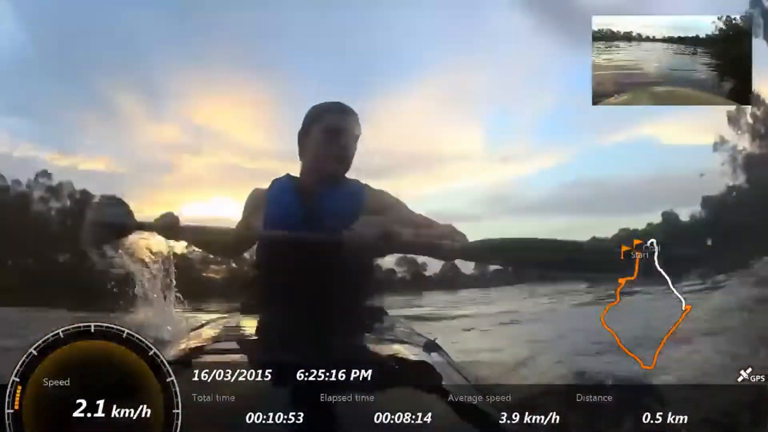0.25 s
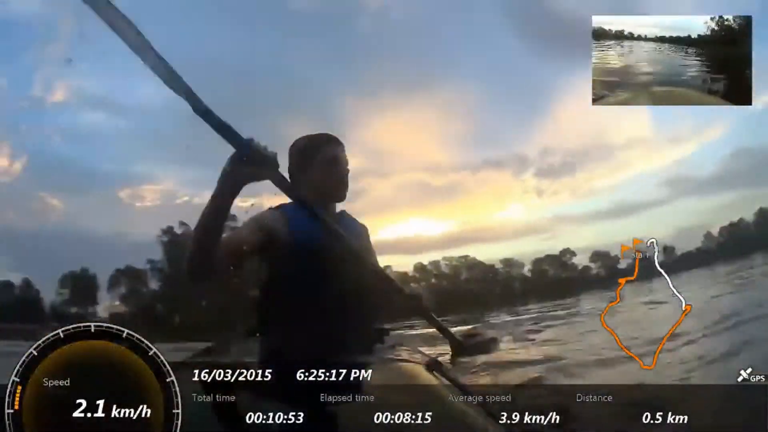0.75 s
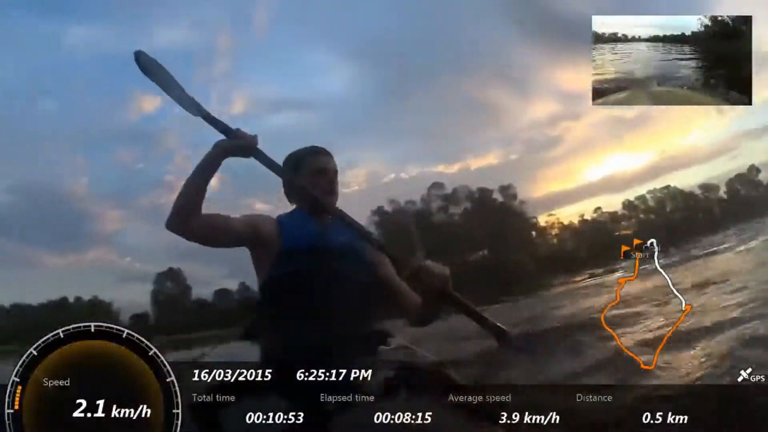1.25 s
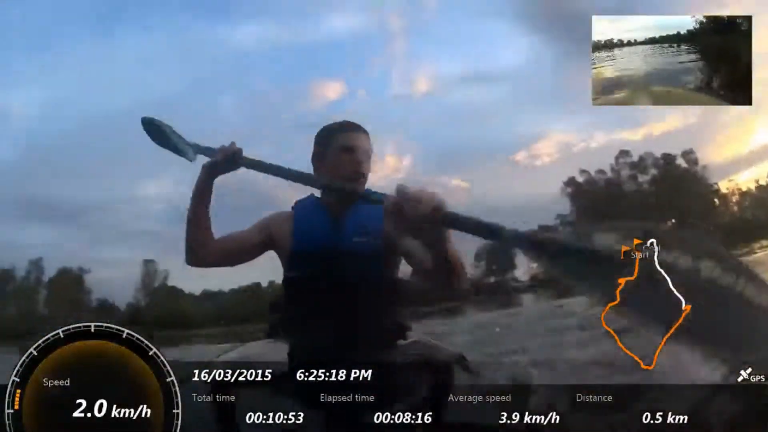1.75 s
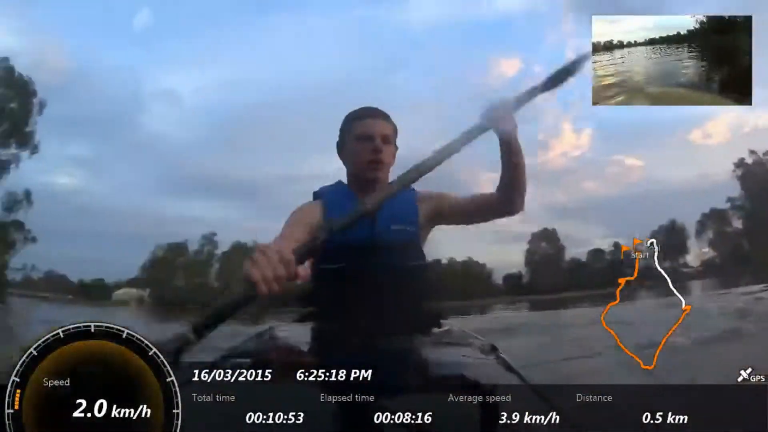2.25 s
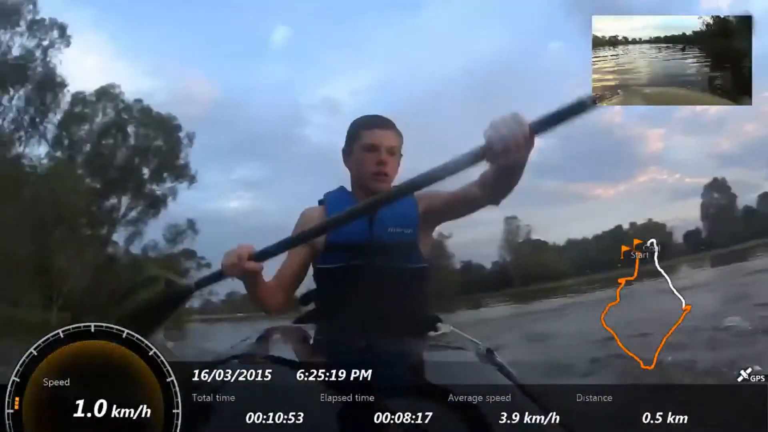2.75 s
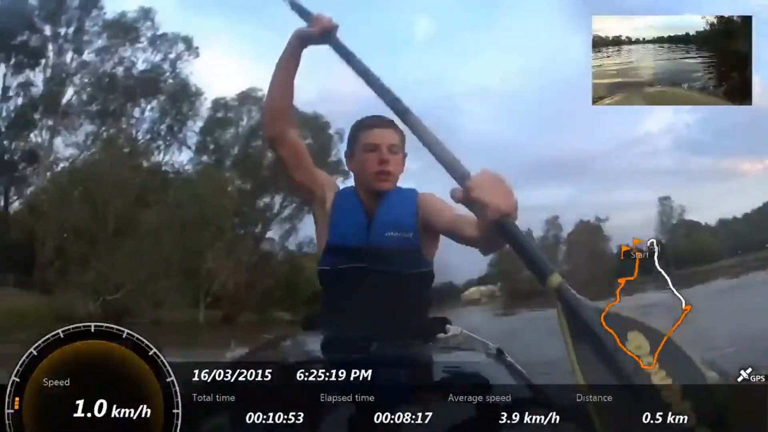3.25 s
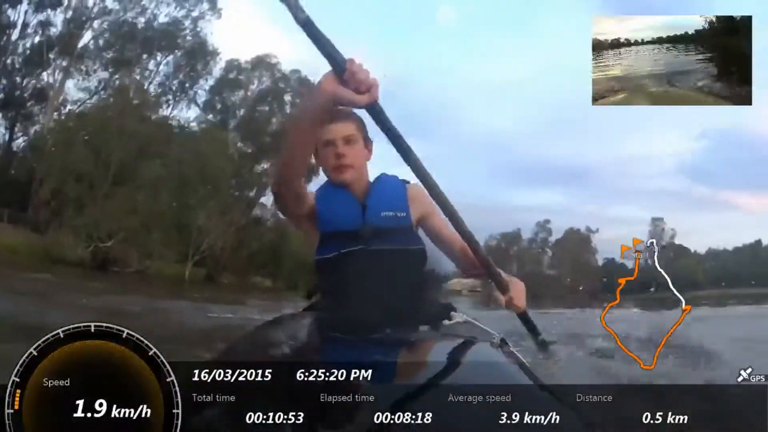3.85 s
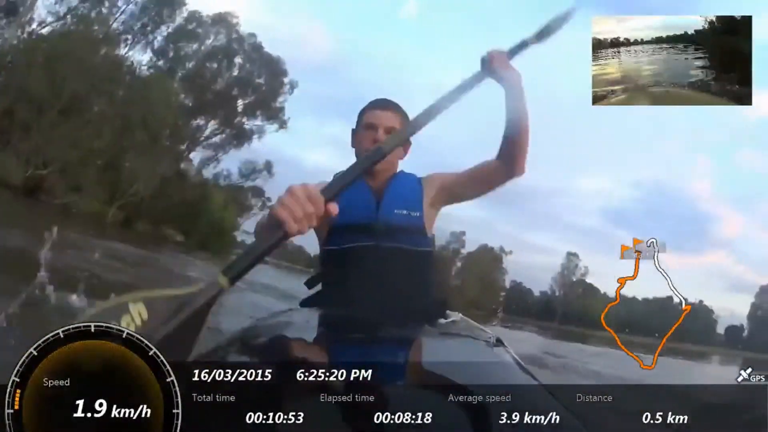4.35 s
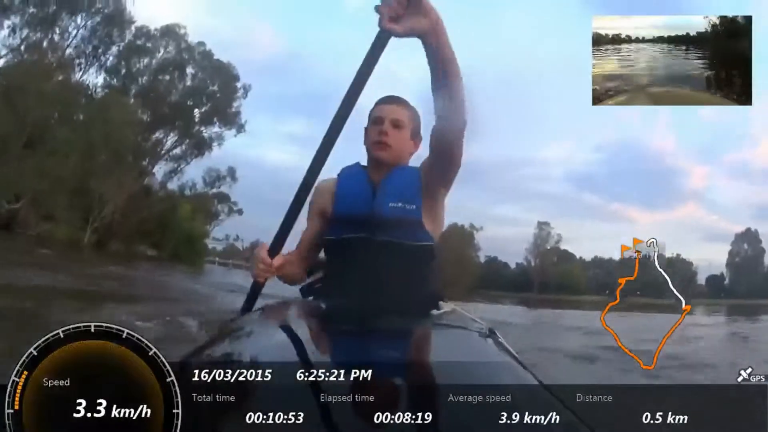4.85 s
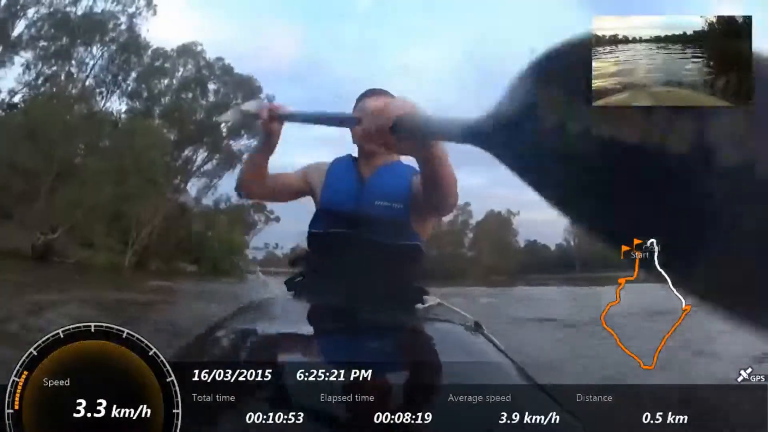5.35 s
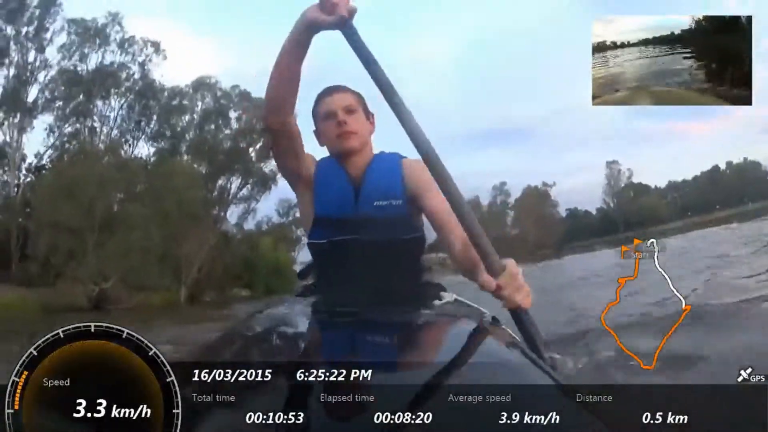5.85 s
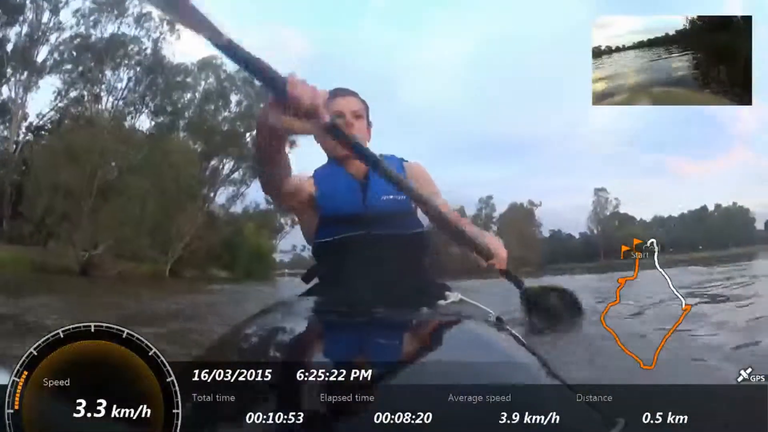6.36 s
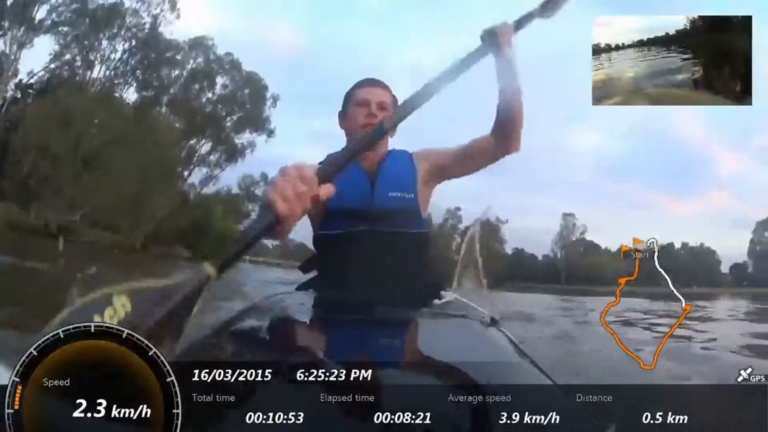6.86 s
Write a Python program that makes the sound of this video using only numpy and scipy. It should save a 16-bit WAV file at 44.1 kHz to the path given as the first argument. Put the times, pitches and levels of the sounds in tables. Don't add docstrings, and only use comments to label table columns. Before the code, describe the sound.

Close, muffled river water churns, knocks and plops against a hollow kayak hull, thinning after three seconds to separate laps, drips and dull booms.

```python
import sys
import numpy as np
from scipy import signal
from scipy.fft import rfft, irfft, next_fast_len
from scipy.io import wavfile
from scipy.ndimage import uniform_filter1d

SR = 44100
rng = np.random.default_rng(int(sys.argv[2]) if len(sys.argv) > 2 else 0)


def transcribe(u):
    v = np.clip(np.atleast_2d(u).T, -1, 1)
    q = np.round(v * 32767).astype(np.int16)
    wavfile.write(sys.argv[1], SR, q)


def gain_from_decibels(decibels):
    exponent = np.asarray(decibels, float) / 20
    return 10 ** exponent


N = 313110

# [t/s, slide level/dB, spray level/dB]
FLOW = [(0.0, -31, -27), (0.3, -32.5, -29.5), (0.85, -37.5, -35), (1.24, -33.5, -31.5), (1.5, -37.5, -35.5),
        (1.9, -31, -34.5), (2.2, -29.5, -31.5), (2.63, -31.5, -27.5), (2.82, -30, -34.5),
        (2.98, -40.5, -37.5), (3.45, -43, -40), (3.68, -50.5, -41), (4.2, -41.5, -40), (4.6, -46.5, -45),
        (4.9, -41, -39.5), (5.5, -39, -39.5), (6.45, -42, -35), (7.1, -45.5, -36.5)]
# [crest t/s, crest level/dB, time to rise 10 dB/s, time to sink 10 dB/s]
WAVES = [(0.339, -33, 0.03, 0.1), (0.653, -30, 0.09, 0.1), (0.818, -35, 0.06, 0.04),
         (0.916, -32.5, 0.07, 0.12), (1.111, -32, 0.06, 0.03), (1.199, -31.5, 0.05, 0.2),
         (1.564, -36, 0.04, 0.06), (1.712, -31, 0.07, 0.1), (0.5, -32, 0.03, 0.12),
         (3.015, -34, 0.03, 0.025), (3.103, -32.5, 0.02, 0.035), (3.255, -31, 0.1, 0.035),
         (3.36, -33, 0.03, 0.08), (3.606, -36, 0.04, 0.035), (3.755, -39, 0.05, 0.04),
         (3.985, -41, 0.08, 0.2), (4.204, -38.5, 0.07, 0.06), (4.395, -37, 0.02, 0.16),
         (4.594, -35, 0.025, 0.06), (5.05, -40, 0.06, 0.05), (5.135, -35, 0.02, 0.04),
         (5.255, -39, 0.02, 0.05), (5.512, -33, 0.2, 0.07), (5.713, -41, 0.1, 0.15), (5.9, -35, 0.09, 0.04),
         (6.068, -39.5, 0.04, 0.06), (6.152, -39, 0.03, 0.1), (3.7, -38, 0.03, 0.04),
         (6.567, -40, 0.05, 0.14), (6.936, -41.5, 0.12, 0.2)]
# [t/s, gurgle level/dB, boom level/dB, time to sink 10 dB/s]
HEAVES = [(0.0, -23.5, -34, 0.22), (0.59, -25.5, -31, 0.3), (0.9, -28.5, -32, 0.1), (1.28, -28, -34, 0.22),
          (1.781, -26.5, -26, 0.24), (2.2, -33.5, -45, 0.35), (2.37, -39, -26, 0.1), (2.86, -29, -26, 0.11),
          (3.24, -35, -42, 0.3), (3.44, -32, -51, 0.27), (4.05, -35.5, -40, 0.27), (4.41, -28.5, -43, 0.14),
          (4.49, -45, -14, .08), (4.67, -32, -38, .08), (4.98, -49.5, -35, .15), (5.2, -27.5, -47, 0.23),
          (5.66, -26.5, -20.5, 0.14), (5.8, -29.5, -37, .2), (6.17, -53, -34, 0.06), (6.9, -48, -42, 0.65)]
# [t/s, peak level/dB]
MIST = [(0.0408, -49), (0.1545, -50), (0.2623, -48), (0.3586, -47), (0.4329, -53), (0.6794, -54),
        (1.0765, -50), (1.2017, -49), (1.4421, -51), (1.6377, -53), (1.7928, -56), (2.1959, -54),
        (2.4344, -52), (2.9233, -51), (3.0754, -53), (3.5533, -55), (3.7569, -57), (4.5999, -53),
        (5.8735, -55), (6.9331, -54)]
# [t/s, peak level/dB, pitch f/Hz, time to fall 60 dB/s]
GULPS = [(0.049, -14, 391, .12), (0.362, -11.5, 430, .07), (0.519, -23, 438, .09), (1.3, -30, 250, .12),
         (1.624, -26, 166, .05), (2.221, -12, 454, .08), (2.784, -16, 400, .1), (2.81, -18, 460, .1),
         (3.24, -30, 480, .11), (4.391, -22, 330, .07), (4.457, -36, 155, .12), (4.594, -28, 260, .2),
         (4.647, -29.5, 180, .09), (5.044, -34, 257, .05), (5.43, -30, 300, .1), (5.621, -26, 310, .1),
         (5.701, -27.5, 175, .08), (6.075, -33.5, 207, .1), (6.618, -34, 530, .12),
         (6.957, -31.5, 280, .12)]
# [t/s, peak level/dB]
DROPS = [(0.0608, -39), (0.2076, -33), (0.4884, -27), (0.62, -33.5), (0.6474, -29), (0.677, -26.5),
         (0.9115, -36), (1.343, -33.5), (2.25, -20.5), (2.2902, -30), (2.71, -28), (2.8255, -34.5),
         (3.1737, -35), (3.271, -30), (3.346, -31), (3.5923, -29.5), (4.1864, -35), (4.436, -31),
         (4.8356, -40), (4.9408, -33.5), (5.117, -32), (4.998, -36), (5.561, -31.5), (5.6956, -34),
         (6.093, -34), (6.156, -30.5), (6.266, -36), (6.5475, -39), (6.561, -28), (6.934, -27)]
# [t/s, peak level/dB, fizz level/dB]
SPLATS = [(1.1652, -45, -64), (1.2176, -28.5, -38), (1.3095, -32, -38), (1.4626, -33, -43),
          (1.74, -31.5, -36), (2.598, -29, -45), (3.06, -48, -43), (4.395, -36, -50), (4.425, -34, -47),
          (4.996, -44, -50), (4.582, -37, -46), (5.508, -30.5, -44), (5.8416, -34, -53),
          (5.9216, -37.5, -42), (6.073, -29, -40)]
# [t/s, peak level/dB, centre f/Hz]
BEADS = [(0.846, -32, 3570), (3.314, -30, 3500), (3.5925, -33, 3450), (3.71, -38, 3450), (3.942, -40, 3100),
         (4.3943, -34, 3400), (5.3502, -36, 3420), (6.2432, -28, 3480), (4.044, -40, 2830),
         (4.095, -40, 2400), (4.81, -40, 2830), (6.485, -38, 2700), (6.44, -38, 2830), (6.31, -38, 2830),
         (3.883, -42, 2700), (1.305, -34, 2050)]
# [t/s, peak level/dB, pitch f/Hz]
PINGS = [(0.417, -39, 4560), (0.6175, -49, 3750), (0.6175, -40, 4570), (0.8555, -41, 4240),
         (0.9991, -46, 4250), (1.0934, -41, 4320), (1.2516, -37, 4310), (1.295, -40, 5410),
         (1.3414, -41, 4320), (1.3917, -44, 4200), (1.4621, -37, 4370), (1.503, -44, 4570),
         (1.5219, -49, 4590), (1.5768, -44, 4560), (1.5958, -43, 3810), (1.7065, -39, 4050),
         (1.7444, -39, 5730), (1.8337, -45, 4180), (2.0348, -42, 4270), (2.0906, -31, 4220),
         (2.3346, -35, 4380), (2.3575, -37, 4520), (2.5706, -35, 4230), (2.6813, -37, 4480),
         (2.7072, -37, 3990), (2.7716, -42, 5620), (2.7926, -43, 4320), (2.8165, -45, 4280),
         (2.9243, -40, 3750), (2.9243, -32, 4060), (3.0475, -45, 4510), (3.0759, -45, 4490),
         (3.1732, -47, 4230), (3.2685, -46, 4140), (3.3149, -44, 4050), (3.3149, -40, 4230),
         (3.3508, -49, 4310), (3.5668, -40, 4650), (3.5922, -43, 4240), (3.7339, -39, 4580),
         (3.7569, -44, 4740), (3.8422, -49, 4120), (3.931, -45, 4130), (4.0442, -42, 4290),
         (4.3944, -44, 4270), (4.9187, -41, 4570), (4.9402, -42, 4620), (4.9965, -42, 5410),
         (5.2869, -43, 4600), (5.3507, -44, 4090), (5.4784, -46, 4240), (5.5084, -43, 4320),
         (5.6645, -44, 4060), (5.7768, -50, 4100), (5.9893, -48, 4240), (6.1325, -44, 5590),
         (6.5176, -45, 4430), (6.5934, -41, 4160), (6.7496, -44, 4100), (6.9676, -46, 4330)]
# [t/s, peak level/dB, pitch f/Hz]
PLOPS = [(0.0697, -31, 1610), (0.9727, -29, 1560), (1.1094, -26, 1580), (1.1857, -33, 1660),
         (1.4935, -29, 1500), (1.7928, -31, 1560), (2.2503, -28, 1610), (2.359, -28, 1600),
         (2.7482, -29, 1590), (2.9971, -31, 1560), (4.1774, -31, 1580), (4.4029, -32, 1610),
         (4.6528, -37, 1580), (4.808, -34, 1570), (4.9302, -33, 1590), (4.9467, -30, 1600),
         (5.1188, -30, 1570), (6.5625, -27, 1580)]
# [t/s, peak level/dB, centre f/Hz]
LAPS = [(0.096, -20, 1230), (0.26, -22, 942), (0.79, -23, 1030), (0.876, -22, 961), (1.095, -22, 1090),
        (1.198, -19, 1290), (1.219, -20, 1150), (1.306, -22, 1010), (1.34, -21, 1000), (1.379, -19, 1240),
        (1.798, -20, 1170), (1.828, -22, 1100), (1.947, -19, 1210), (2.049, -23, 1180), (2.096, -19, 999),
        (2.141, -20, 1180), (2.214, -18, 1180), (2.402, -20, 1180), (2.771, -19, 1220), (3.075, -19, 1270),
        (3.346, -22, 1190), (3.604, -25, 1020), (3.98, -26, 950), (4.158, -28, 1180), (4.37, -23, 1070),
        (4.969, -29, 1170), (5.366, -23, 1010), (5.413, -19, 1020), (5.529, -25, 1200), (5.846, -26, 926),
        (5.897, -23, 1280), (6.055, -27, 1190), (6.148, -26, 1150), (6.34, -28, 1340), (6.888, -30, 1580)]
# [t/s, peak level/dB, time to fall 60 dB/s]
KNOCKS = [(0.149, -19.5, .06), (0.478, -15, .08), (0.818, -15, .06), (0.915, -20, .06), (1.372, -18, .08),
          (1.46, -16, .05), (1.558, -16.5, .07), (1.909, -16, .06), (1.985, -17, .1), (2.07, -13.5, .065),
          (3.013, -19, .047), (3.742, -16, .09), (3.236, -18, .09), (4.41, -19, .12), (2.03, -18, .08),
          (4.198, -20, .08), (4.37, -14, .13), (5.167, -22, .08), (5.363, -15, .06), (5.44, -21, .06),
          (5.485, -21, .04), (6.915, -26, .1)]
# [t/s, peak level/dB, centre f/Hz]
SLAPS = [(0.191, -11.5, 1270), (0.333, -9.5, 986), (0.411, -16, 1250), (0.904, -20, 1020),
         (1.256, -14, 950), (1.397, -13, 980), (1.493, -13, 1100), (1.642, -13, 1420), (1.852, -15, 930),
         (1.981, -13, 970), (2.281, -18, 1190), (2.322, -15.5, 1460), (2.458, -15, 1150),
         (2.545, -13.5, 1010), (2.658, -14.5, 1340), (2.73, -10.5, 1020), (2.79, -17, 1030),
         (2.859, -15.5, 1120), (3.094, -14, 1250), (3.688, -18, 1270), (4.589, -17.5, 1220),
         (4.999, -16, 1050), (5.12, -11.5, 1010), (5.246, -13, 915), (5.393, -14, 940), (5.451, -13.5, 920),
         (5.508, -14.5, 990), (5.926, -15.5, 1480), (6.244, -18.5, 1400), (6.561, -24, 1670)]
# [f/Hz, level/dB]
SHELL = [(25, -50), (55, -28), (110, -19), (150, -8.5), (400, -8), (1100, -7), (1650, -11), (1800, -23),
         (3000, -23), (5000, -34.5), (6500, -34), (10000, -37), (11000, -65)]
# [f/Hz, width/Hz, level/dB]
RINGS = [(77, 23, 13), (626.6, 161, 7.5), (833, 54, -6), (985, 72, 7), (1250, 294, 7), (1587, 79, 6.5),
         (2250, 290, -4.5), (2820, 227, 7.5), (3420, 190, 6.5), (3785, 195, -8), (4212, 250, 8),
         (4584, 390, 6), (5700, 590, 5)]
# [f/Hz, share 0-1]
SAME = [(45, .82), (150, .9), (260, .74), (400, .52), (520, .92), (1550, .9), (1850, .35), (2300, .65),
        (3700, .4), (4600, .7), (7000, .45)]
# [f/Hz, left leads by/rad]
LEAD = [(0, 0), (260, -.35), (420, -.1), (750, -1.35), (1100, .5), (1420, -.55), (1700, 1.5), (2000, .3),
        (2250, 2.8), (2800, .6), (3150, 2.5), (4500, .2), (5300, -.5), (5900, 2.8)]
# [f/Hz, left minus right/dB]
TILT = [(100, .5), (150, -4), (430, -1.2), (620, -3.8), (1000, -.8), (1200, -3.2), (1550, 0), (2450, 3),
        (3500, -2), (5700, 2), (9000, -1)]

CALM_GURGLE_DB, CALM_BOOM_DB = -7.5, -11
HEAVE_RISE = .6
SPRAY_FOLLOW = .25
SMACK = 2.5
FIZZ_DB = -26.5
DROP_HZ, DROP_OCTAVES, BEAD_OCTAVES, PING_OCTAVES = 2826, .31, .16, .14
TICK_DB, PING_DB, LAP_DB, PLOP_DB, BUBBLE_DB = -.4, .3, -4.5, -.5, -6.5
LAP_T60, PLOP_T60, BUBBLE_T60, SLAP_T60 = .045, .045, .07, .052
GLIDE = .13
KNOCK_HZ = 620
HISS_DB, RUMBLE_DB = -69.6, -76.5
CEILING = .21
EDGE_HZ = 11060


def evened(x):
    return x / np.sqrt(np.mean(x ** 2) + 1e-20)


def read(points, hz):
    f, value = np.transpose(points)
    return np.interp(np.log(hz + 1), np.log(f + 1), value)


def add(mix, s, sound):
    part = mix[:, round(s * SR):][:, :sound.shape[1]]
    part += sound[:, :part.shape[1]]


def shell_db(hz):
    rings = sum(db / (1 + (2 * (hz - f) / width) ** 2) for f, width, db in RINGS)
    return read(SHELL, hz) + rings


def hump(hz, centre_hz, octaves):
    return np.maximum(-6 * (np.log2((hz + 1) / centre_hz) / octaves) ** 2, -45)


def no_lows(hz, knee_hz, octaves):
    return hump(np.minimum(hz, 2100), knee_hz, octaves)


def causal(db):
    mirrored = np.concatenate([db, db[-2:0:-1]])
    log_gain = np.log(gain_from_decibels(mirrored))
    spectrum = np.exp(np.conj(signal.hilbert(log_gain)))
    return np.fft.ifft(spectrum).real[:4096]


def swells(t, calm_db, s, crest_db, rise_s, sink_s):
    late = t[:, None] - s
    crests = crest_db - 10 * np.where(late > 0, late / sink_s, -late / rise_s)
    return 10 * np.log10(gain_from_decibels(2 * calm_db) + gain_from_decibels(2 * crests).sum(1))


def bubbles(per_s, spread_db, cycles, lo_hz, hi_hz, count=16):
    out, grains = np.zeros((2, N + SR // 2)), []
    kind = rng.integers(0, count, (2, N))
    loudness = gain_from_decibels(spread_db * np.minimum(rng.exponential(1, N), 3.4))
    size = loudness * (rng.random(N) < per_s / SR)
    for hz in np.geomspace(lo_hz, hi_hz, count):
        u = np.arange(int(3 * cycles * SR / hz)) * hz / SR
        tone = np.sin(2 * np.pi * u * (1 + 0.1113 * u / cycles))
        grain = tone * np.exp(-2 * u / cycles) * np.minimum(u / 2.6, 1)
        grains.append(evened(grain) / np.sqrt(len(u) / hz))
    for at in np.flatnonzero(size):
        for port, k in enumerate(kind[:, at]):
            out[port, at:at + len(grains[k])] += size[at] * grains[k]
    return evened(out[:, :N])


def flow():
    big = bubbles(per_s=1300, spread_db=1.6, cycles=9., lo_hz=129.2, hi_hz=1882.6)
    fine = bubbles(per_s=800, spread_db=4.1, cycles=10., lo_hz=1847, hi_hz=6310)
    drive = rng.standard_normal((2, N)) + 0.6 * big + 0.7 * fine
    hz, t, z = signal.stft(drive, SR, nperseg=1024, noverlap=896)

    s, *levels = np.transpose(FLOW)
    slide, spray = (np.interp(t, s, c) for c in levels)
    rush = swells(t, slide, *np.transpose(WAVES))
    s, gurgle_db, boom_db, sink_s = np.transpose(HEAVES)
    rise_s = HEAVE_RISE * sink_s
    gurgle = swells(t, slide + CALM_GURGLE_DB, s, gurgle_db, rise_s, sink_s)
    boom = swells(t, slide + CALM_BOOM_DB, s, boom_db, rise_s, sink_s)

    low = 1 / (1 + (hz / 400) ** 4)[:, None]
    deep = 1 / (1 + (hz / 110) ** 6)[:, None]
    high = 1 / (1 + (2000 / (hz + 1)) ** 8)[:, None]
    field = (1 - low - high) * (rush - .4)
    field += high * (spray - 3.5 + SPRAY_FOLLOW * (rush - slide))
    field += (low - deep) * gurgle + deep * boom

    noise = rng.standard_normal((len(t), len(hz))).T
    patches = uniform_filter1d(uniform_filter1d(noise, 9, 0), 14, 1)
    scattered_spray = uniform_filter1d(uniform_filter1d(noise[::-1], 22, 0), 5, 1)
    gusts = uniform_filter1d(rng.standard_normal(len(t)), 9)
    spray_sheets = uniform_filter1d(rng.standard_normal(len(t)), 12)
    field += 2.0 * evened(patches) + 0.16 * evened(gusts)
    field += 1.6 * high * (evened(scattered_spray) + evened(spray_sheets))

    rough = signal.istft(z * gain_from_decibels(field), SR, nperseg=1024, noverlap=896)[1][:, :N]
    taps = causal(shell_db(np.fft.rfftfreq(8192, 1 / SR)))
    taps = taps[None] / np.linalg.norm(taps)
    return gain_from_decibels(-3.6) * signal.oaconvolve(rough, taps, axes=1)[:, :N]


def blow(peak_db, colour_db, rise_s, t60, size=8192):
    t = np.arange(size) / SR
    fall = gain_from_decibels(-60 * t / t60) + 0.21 * gain_from_decibels(-18 * t / t60)
    shape = (1 - np.exp(-t / rise_s)) * fall
    burst = rng.standard_normal((2, size)) * shape * np.cos(np.pi * t / t[-1] / 2)
    burst[:, 12] += SMACK
    sound = signal.fftconvolve(burst, causal(colour_db)[None, :size], axes=1)[:, :size]
    return gain_from_decibels(peak_db) * sound / abs(sound).max(1, keepdims=True)


def bubble(peak_db, hz, t60):
    t = np.arange(int(t60 * SR)) / SR
    tone = np.sin(2 * np.pi * hz * t * (1 + GLIDE * t / t60)) * np.minimum(t / .0012, 1)
    return np.outer([1, 1], gain_from_decibels(peak_db - 60 * t / t60) * tone)


def fizz():
    out, hz = np.zeros((2, N)), np.fft.rfftfreq(2048, 1 / SR)
    colour_db = shell_db(hz) + hump(hz, 7800, .55)
    rows = [(s, db + 3) for s, db in MIST]
    rows += [(s, db + FIZZ_DB) for s, db in DROPS]
    rows += [(s, fizz_db) for s, _, fizz_db in SPLATS]
    for s, fizz_db in rows:
        add(out, s, blow(fizz_db + 3.5, colour_db, .0003, .0066, size=1024))
    return out


def gulps():
    out, hz = np.zeros((2, N)), np.fft.rfftfreq(8192, 1 / SR)
    for s, peak_db, pitch_hz, t60 in GULPS:
        colour_db = shell_db(hz) + hump(hz, pitch_hz, .27)
        add(out, s, blow(peak_db - 6.5, colour_db, .0037, t60))
        add(out, s + .003, bubble(peak_db - 12, pitch_hz, 1.6 * t60))
    return out


def drops():
    out, hz = np.zeros((2, N)), np.fft.rfftfreq(2048, 1 / SR)
    rows = [(s, db, DROP_HZ, DROP_OCTAVES) for s, db, *_ in DROPS + SPLATS]
    rows += [(*row, BEAD_OCTAVES) for row in BEADS]
    rows += [(s, db + PING_DB, f, PING_OCTAVES) for s, db, f in PINGS]
    for s, peak_db, centre_hz, octaves in rows:
        colour_db = shell_db(hz) + hump(hz, centre_hz, octaves) + no_lows(hz, 1910, .077)
        add(out, s, blow(peak_db + TICK_DB, colour_db, .00021, .01, size=1024))
    return out


def plops():
    out, hz = np.zeros((2, N)), np.fft.rfftfreq(4096, 1 / SR)
    for s, peak_db, pitch_hz in PLOPS:
        colour_db = shell_db(hz) + hump(hz, 1.06 * pitch_hz, .2)
        add(out, s - .001, blow(peak_db + PLOP_DB, colour_db, .0004, PLOP_T60, size=2048))
        add(out, s, bubble(peak_db + BUBBLE_DB + 3, .95 * pitch_hz, BUBBLE_T60))
    return out


def laps():
    out, hz = np.zeros((2, N)), np.fft.rfftfreq(4096, 1 / SR)
    for s, peak_db, centre_hz in LAPS:
        colour_db = shell_db(hz) + hump(hz, centre_hz, .3)
        add(out, s - .001, blow(peak_db + LAP_DB, colour_db, .0004, LAP_T60, size=2048))
        add(out, s, bubble(peak_db + BUBBLE_DB, .96 * centre_hz, BUBBLE_T60))
    return out


def slaps():
    out, hz = np.zeros((2, N)), np.fft.rfftfreq(8192, 1 / SR)
    spray_colour_db = shell_db(hz) + hump(hz, 4500, .89) + no_lows(hz, 1900, .086)
    rows = [(s, db, KNOCK_HZ, t60) for s, db, t60 in KNOCKS]
    rows += [(*row, SLAP_T60) for row in SLAPS]
    for s, peak_db, centre_hz, t60 in rows:
        colour_db = shell_db(hz) + hump(hz, centre_hz, .4)
        add(out, max(s - .0015, 0), blow(peak_db - 5, colour_db, .00037, t60))
        add(out, s, blow(peak_db - 28, spray_colour_db, .0028, .48 * t60, size=4096))
    return out


def ports(pair):
    size = next_fast_len(N + 4096)
    hz = np.fft.rfftfreq(size, 1 / SR)
    left, other = rfft(pair, size)
    lead = np.interp(hz, *np.transpose(LEAD))
    same = np.clip(read(SAME, hz), 0, 1)
    right = (same * left + np.sqrt(1 - same ** 2) * other) * np.exp(-1j * lead)
    tilt = gain_from_decibels(read(TILT, hz) / 2)
    return irfft(np.array([left * tilt, right / tilt]), size)[:, :N]


def scene():
    return ports(flow() + fizz() + gulps() + drops() + plops() + laps() + slaps())


def roll_off(x):
    return signal.sosfilt(signal.butter(12, 11390, fs=SR, output="sos"), x)


def record(dry):
    rumble_band = signal.butter(1, [18, 50], "band", fs=SR, output="sos")
    rumble = signal.sosfilt(rumble_band, rng.standard_normal(N))
    own_hiss = 0.82 * rng.standard_normal(dry.shape)
    shared_hiss = 0.86 * rng.standard_normal(N)
    noisy = dry + gain_from_decibels(HISS_DB) * (own_hiss + shared_hiss) + gain_from_decibels(RUMBLE_DB) * evened(rumble)
    held = CEILING * np.tanh(noisy / CEILING)
    low_pass = signal.firwin(801, EDGE_HZ, window=("kaiser", 9), fs=SR)
    limited = signal.oaconvolve(held, low_pass[None], "same")
    return roll_off(limited)


dry = scene()
out = record(dry)
transcribe(out)
```